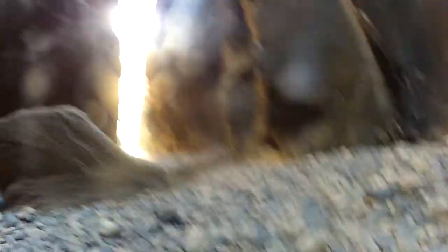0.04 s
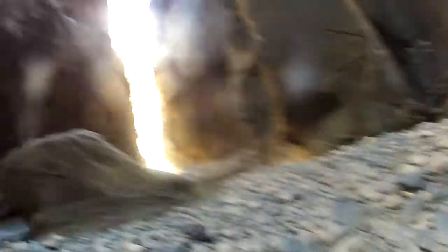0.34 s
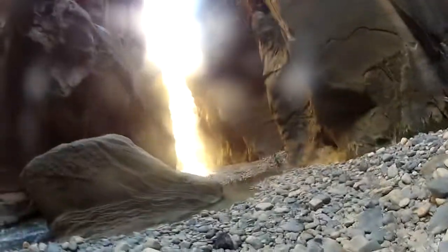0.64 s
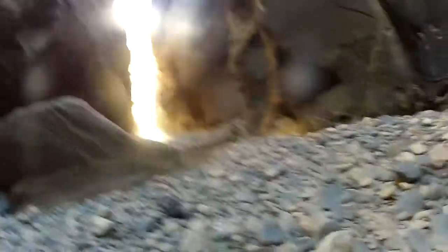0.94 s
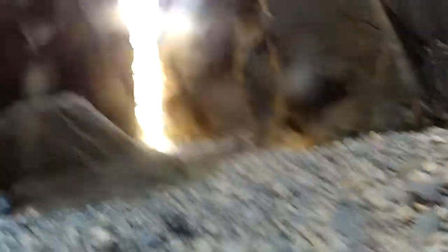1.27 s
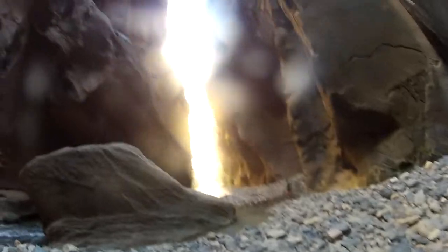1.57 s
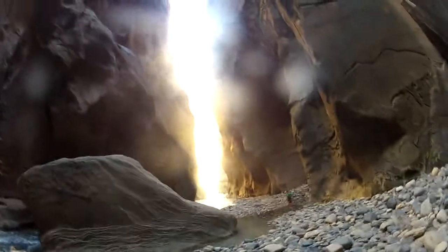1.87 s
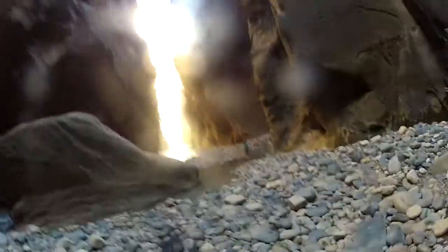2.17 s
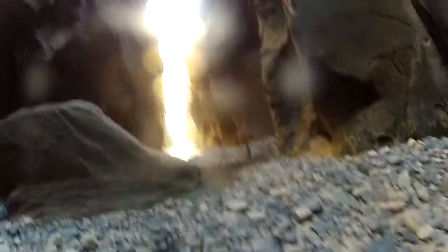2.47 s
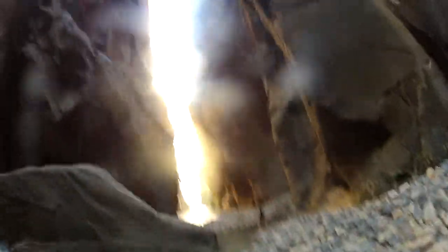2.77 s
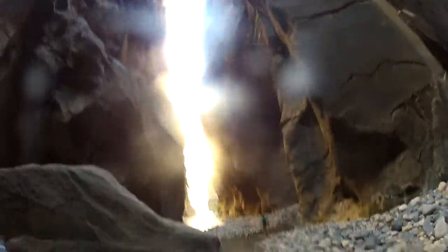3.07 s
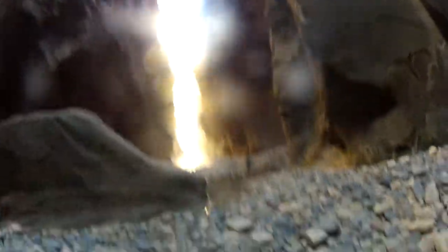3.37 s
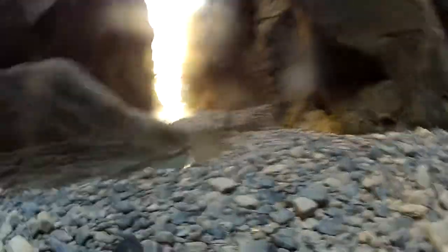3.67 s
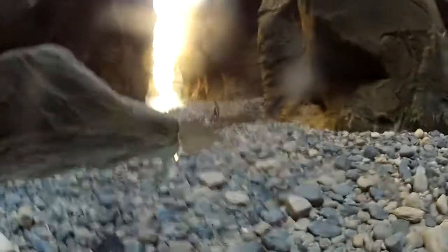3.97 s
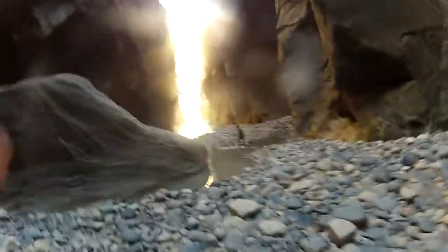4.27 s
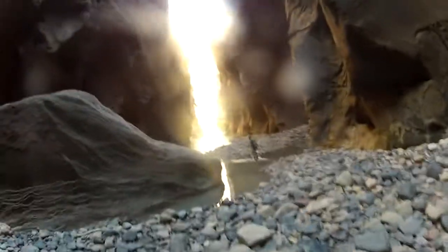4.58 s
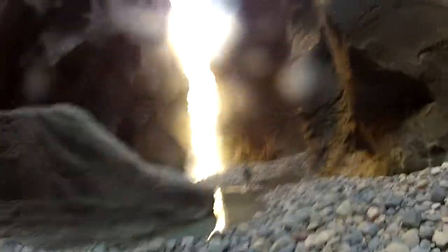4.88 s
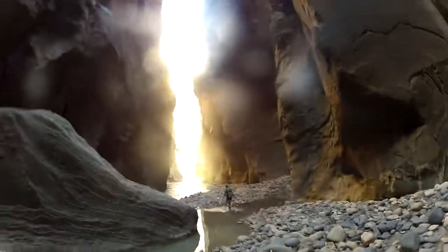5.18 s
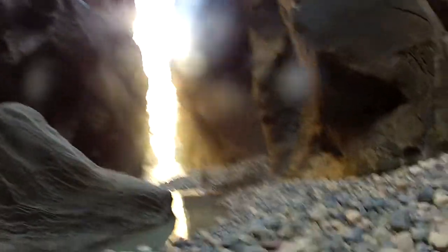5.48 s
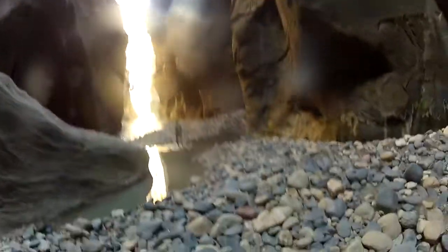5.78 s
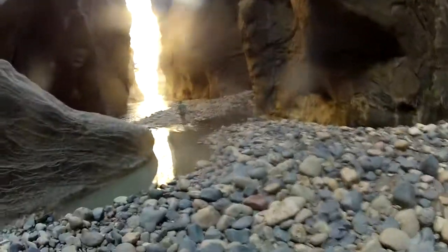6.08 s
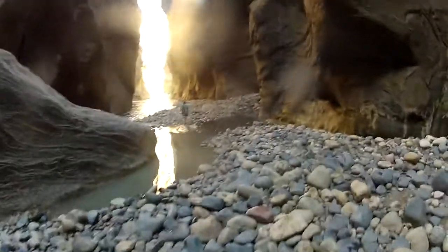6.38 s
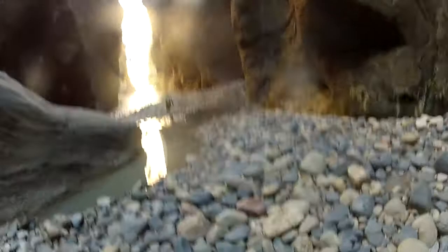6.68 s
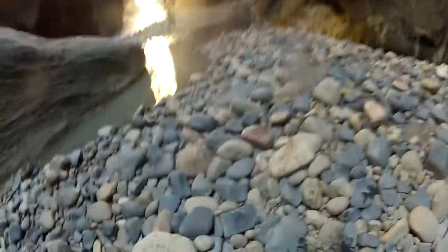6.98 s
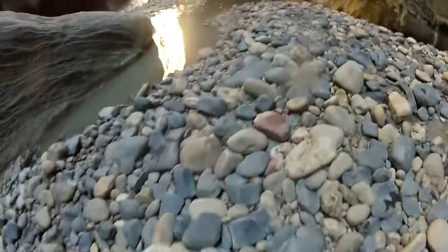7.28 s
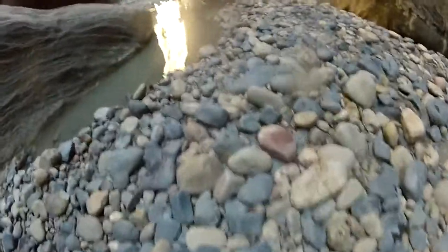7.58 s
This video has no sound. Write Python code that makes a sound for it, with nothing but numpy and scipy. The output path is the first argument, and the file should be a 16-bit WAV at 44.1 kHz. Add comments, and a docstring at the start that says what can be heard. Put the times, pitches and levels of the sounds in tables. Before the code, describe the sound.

Someone walks slowly over a pebble bank in a canyon, with light stone clicks and dull, deep jolts over the even hiss of a shallow stream. The microphone sits in a plastic case, which colours the water and adds close handling noise: a cluster of loud rubs, bumps and clacks about halfway through. More steps follow, with two dry snaps from the camera mount. The treble is slightly gritty throughout.

```python
"""Slow steps over a pebble bank in a slot canyon, heard from a hand-held camera in a case.
A shallow stream rushes from the start, coloured by the case; steps tick pebbles, knock stones and
swing the mount. From about 3.3 to 4.5 s a hand rubs, bumps and clacks the case. The steps go on,
the stream's hollow note sinks and partly returns, and the mount snaps at 5.1 and 7.5 s.
Throughout, the recorder holds each sample of a slow clock, which adds a gritty treble."""
import sys
import numpy as np
from scipy import signal
from scipy.fft import rfft, irfft, next_fast_len
from scipy.io import wavfile
from scipy.ndimage import map_coordinates

SR = 44100
rng = np.random.default_rng(int(sys.argv[2]) if len(sys.argv) > 2 else 0)


def file_out(sig):
    """Save sig as 16-bit WAV at sys.argv[1]."""
    # one column per channel
    cols = np.atleast_2d(sig).T
    # limit, then scale
    lim = np.clip(cols, -1, 1)
    pcm = np.round(lim * 32767).astype(np.int16)
    wavfile.write(sys.argv[1], SR, pcm)


N = 341334

# small pebbles ticking underfoot: start_s, level_db
PEBBLE_TICKS = [(0.1526, -29.5), (0.8886, -29.5), (1.3902, -36), (1.9229, -28), (2.3797, -29.5),
                (2.5417, -36.5), (2.6, -36), (2.621, -31), (3.9674, -34), (4.176, -31), (4.188, -31),
                (4.3433, -35), (4.372, -24.5), (4.4192, -21), (4.9412, -33), (5.2116, -34.5), (5.574, -39),
                (5.641, -36.5), (6.275, -43), (6.6997, -31.5), (6.7526, -30.5), (7.524, -27)]
# stone knocks and small, bright clacks of the case:
# start_s, level_db, pitch_hz, t60_s, brightness_db, grit_db
KNOCK_HITS = [(0.3117, -26, 1100, 0.033, -7.5, -6), (3.411, -29, 1170, 0.015, 10.5, -2),
              (5.016, -38.5, 1100, 0.014, 18.5, -7), (5.166, -34, 790, 0.023, -14, 3),
              (5.185, -37, 644, 0.032, -3, 1.5), (7.2774, -31.5, 913, 0.072, 3.5, -0.5),
              (7.280, -38, 625, 0.06, -24, -2)]
# the modes of a knock: pitch_ratio, level_db, t60_ratio
KNOCK_MODES = [(1, 1, 1), (2.005, -2, 0.72), (2.35, 5.5, 0.22)]
# steps and jolts that swing the mount: centre_s, level_db, pitch_hz, half_length_s
MOUNT_SWINGS = [(0.251, -30.5, 43.6, 0.01), (0.392, -31.5, 42, 0.03), (0.954, -24.5, 40.4, 0.031),
                (1.742, -28.5, 34.5, 0.028), (2.301, -22, 39.3, 0.032), (2.422, -24.5, 29.4, 0.05),
                (2.836, -17.5, 36, .022), (3.354, -29.5, 37, 0.016), (3.504, -19, 42.2, 0.0086),
                (4.174, -14, 49.3, 0.019), (4.289, -17, 40.5, .018), (4.363, -15, 40, 0.019),
                (5.005, -15, 48.7, 0.031), (5.703, -32, 35.4, 0.019), (6.168, -21.5, 45.4, 0.023),
                (6.6, -29.5, 45.7, 0.017), (6.763, -22, 39.2, 0.014), (7.287, -23.5, 38.7, 0.026)]
# tone of the trembling mount: frequency_hz, gain_db
TREMOR_EQ = [(12, -14), (24, -1.5), (38, 1.5), (55, -5), (80, -19), (130, -31), (300, -54), (600, -120)]
# sharp snaps of the mount: start_s, level_db, centre_hz
MOUNT_SNAPS = [(5.1258, -25, 3400), (7.4819, -22.5, 3310)]
# hand strokes, each pressing harder until it lets go: release_s, level_db, rise_s
HAND_RUBS = [(2.395, -43.5, 0.036), (2.755, -49, .08), (3.348, -40.5, 0.046), (3.472, -44, 0.029),
             (3.606, -25.5, 0.13), (3.724, -33, 0.1), (4.108, -34.5, 0.074), (4.149, -28, 0.032),
             (4.36, -34, 0.013), (4.447, -39.5, 0.048), (5.012, -46, .05), (6.715, -49.5, 0.063),
             (7.402, -46.5, 0.04)]
# tone of skin sliding on the case: frequency_hz, gain_db
SKIN_EQ = [(60, -7), (110, 4), (300, -3), (560, -8), (1100, -3.5), (1400, -8.5), (1800, -1), (2200, 1),
           (2650, -11), (3650, -9.5), (4050, -20), (4600, -20), (5950, -29)]
# soft pushes of the hand on the case: centre_s, push_db, half_length_s
HAND_BUMPS = [(3.668, -11, 0.0054), (3.729, -2.5, 0.0018), (4.099, -1, 0.0038), (7.364, -29, 0.0016)]
# hard contacts on the case: start_s, level_db
CASE_CLACKS = [(3.566, -18.5), (3.594, -27), (3.608, -26), (4.1407, -17.5), (4.155, -1), (4.1563, -8)]
# the modes of the plastic case: pitch_hz, level_db, t60_s
CASE_MODES = [(180, 3, 0.025), (323, -3, 0.029), (800, -5, 0.015), (1200, -14, 0.012), (1720, 3, 0.0059),
              (2210, 7, 0.012), (3550, 0, 0.011), (4700, -17, 0.01), (5300, -17, 0.0096)]
# the stream's faders, riding slowly as the camera moves: time_s, rush_db, hollow_db
STREAM_LEVELS = [(0, -53, -62.5), (3.3, -53.5, -62.5), (4.7, -54, -68), (5.8, -55, -86), (7.7, -55, -73)]
# tone of the rushing water: frequency_hz, gain_db
RUSH_EQ = [(60, -7), (110, -7.5), (280, -5.5), (650, -12.5), (1350, -14), (1750, -7.5), (2200, -0.5),
           (2750, -11), (3200, -8), (3700, -11.5), (4200, -21.5), (4900, -14), (5500, -22.5), (5980, -35.5)]
# narrow resonance in the rush: centre_hz, half_width_hz, boost_db
RUSH_PEAKS = [(2210, 240, 2)]

T = np.arange(N) / SR
AROUND = np.arange(-SR // 5, SR // 5) / SR  # seconds either side of a swing or bump
CLOCK_HZ, TOP_HZ = 12000, 15500
GRIP_START_S, GRIP_END_S, GRIP_FADE_S = 3.6, 4.13, 0.21


def pebbles(trim_db=-1, bounce_db=-6, settle_db=-44, settle_spread_db=1.5, settle_lag_s=0.012):
    """Pebbles tick and chatter, each bounce weaker; each tick unsettles a fainter neighbour."""
    out = np.zeros(N)
    chance = rng.standard_normal((len(PEBBLE_TICKS), 2))
    neighbours = [(s + settle_lag_s * abs(lag), settle_db + settle_spread_db * size)
                  for (s, _), (lag, size) in zip(PEBBLE_TICKS, chance)]
    for s, db in PEBBLE_TICKS + neighbours:
        gaps_s = rng.uniform(0.0013, 0.0043, size=3)
        for bounce, delay in enumerate(np.cumsum([0, *gaps_s])):
            tick = burst(hz=5090, width_hz=870, rise_s=0.0005)
            add(out, s + delay, amp(db + trim_db + bounce_db * bounce) * tick)
    return out


def knocks(ping_hz=4520, ping_db=-15, attack_s=0.00098):
    """Knocks with a short ring and grit; each also sets off a thin ping in the camera case."""
    out, t = np.zeros(N), T[:SR // 10]
    attack = 1 - np.exp(-t / attack_s)
    for s, db, hz, t60, bright_db, grit_db in KNOCK_HITS:
        ring = sum(partial(t, hz * ratio, level + bright_db * (k > 0), share * t60)
                   for k, (ratio, level, share) in enumerate(KNOCK_MODES))
        case_ping = partial(t, ping_hz, ping_db + min(bright_db, 0), t60)
        add(out, s, amp(db) * (ring + case_ping) * attack)
        add(out, s, amp(db + grit_db) * burst(hz=hz, width_hz=0.74 * hz, rise_s=t60 / 14))
    return out


def mount_sway(trim_db=-0.5, heel_db=-11, heel_lead_s=0.0224, rest_db=-50, grip_db=-31, shake_db=-18.5):
    """The heel thuds and the mount swings; it trembles more around steps and as the grip shifts."""
    swings = np.zeros(N)
    tremor_power = amp(rest_db) ** 2 + (amp(grip_db) * grip()) ** 2
    for s, db, hz, half_length in MOUNT_SWINGS:
        start = s + AROUND[0]
        add(swings, start, amp(db + trim_db) * thud(hz, half_length))
        add(swings, start - heel_lead_s, amp(db + heel_db) * thud(hz=61.3, half_length_s=0.01))
        tremor_power += (amp(db + shake_db) * swell(s, s, rise_s=0.2, fall_s=0.36)) ** 2
    tremor = noise(lambda hz: eq(TREMOR_EQ, hz))
    return swings + np.sqrt(tremor_power) * tremor


def case_clacks(crack_db=-12):
    """Each hard contact cracks and briefly rings the plastic case."""
    out, t = np.zeros(N), T[:SR // 20]
    for s, db in CASE_CLACKS:
        ring = sum((-1) ** k * partial(t, hz, level + rng.normal(0, 1), t60)
                   for k, (hz, level, t60) in enumerate(CASE_MODES))
        add(out, s, amp(db) * ring / np.abs(ring).max())
        add(out, s, amp(db + crack_db) * burst(hz=2700, width_hz=4300, rise_s=0.00073))
    return out


def hand_bumps(spring_hz=36, damping=0.4):
    """A soft push squeezes the air in the case, which then springs back."""
    push = np.zeros(N)
    for s, db, half_length in HAND_BUMPS:
        rounded_spike = np.exp(0.5 - np.hypot(AROUND / half_length, 0.5))
        add(push, s + AROUND[0], amp(db) * rounded_spike)
    return filtered(push, lambda hz: hz ** 2 / (spring_hz ** 2 - hz ** 2 + 2j * damping * spring_hz * hz))


def hand_rubs(grains_per_s=1400, hiss_gain=0.64, clump_db=1.6, trim_db=-1, grip_db=-47.5, grind_db=14.5):
    """Skin sticks and slips on the case: clumps of grains over a hiss; a firm stroke grinds low."""
    power = (amp(grip_db) * grip()) ** 2
    for s, db, rise in HAND_RUBS:
        stroke = swell(s - 0.15 * rise, s, rise_s=rise, fall_s=0.29 * rise)
        power += (amp(db) * stroke) ** 2
    pressure = np.sqrt(power)
    slips = unit(rng.standard_normal(N) * (rng.random(N) < grains_per_s / SR))
    friction = (slips + hiss_gain * rng.standard_normal(N)) * amp(clump_db * wobble(260))
    rustle = unit(filtered(friction, lambda hz: eq(SKIN_EQ, hz)))
    grind = noise(lambda hz: bell(hz, centre=474, half_width=370))
    # the grind grows faster with pressure than the rustle
    return amp(trim_db) * pressure * rustle + amp(grind_db) * pressure ** 1.83 * grind


def grip():
    """Envelope of the hand shifting its grip once, 0 to 1."""
    return swell(GRIP_START_S, GRIP_END_S, GRIP_FADE_S, GRIP_FADE_S)


def mount_snaps():
    """The mount snaps with a dry, bright click."""
    out = np.zeros(N)
    for s, db, hz in MOUNT_SNAPS:
        add(out, s, amp(db) * burst(hz=hz, width_hz=1430, rise_s=0.00055))
    return out


def stream(flutter_db=0.37, rush_trim_db=2, hollow_trim_db=-5):
    """The bed: water rushes some way off, smoothed by the canyon, coloured by the air in the case."""
    times, *faders = np.transpose(STREAM_LEVELS)
    rush_db, hollow_db = [np.interp(T, times, fader) for fader in faders]
    peaks = lambda hz: amp(sum(db * bell(hz, centre, width) for centre, width, db in RUSH_PEAKS))
    rush = noise(lambda hz: eq(RUSH_EQ, hz) * peaks(hz))
    hollow = noise(lambda hz: bell(hz, centre=1110, half_width=90))
    rush *= amp(rush_db + rush_trim_db + flutter_db * wobble(11))
    return rush + hollow * amp(hollow_db + hollow_trim_db)


def burst(hz, width_hz, rise_s):
    """A click peaking near 1: band-passed noise that rises and dies away."""
    t = T[:SR // 20]
    edges = np.clip([hz - width_hz / 2, hz + width_hz / 2], 100, SR / 2 - 100)
    band = signal.butter(3, edges, "band", fs=SR, output="sos")
    hiss = signal.sosfilt(band, rng.standard_normal(2 * len(t)))[len(t):]
    envelope = t / rise_s * np.exp(1 - t / rise_s)
    click = hiss * envelope
    return 0.5 * np.linalg.norm(envelope) * click / np.linalg.norm(click)


def partial(t, hz, db, t60):
    """A struck sine that falls 60 dB in t60 seconds."""
    return amp(db - 60 * t / t60) * np.sin(2 * np.pi * hz * t)


def thud(hz, half_length_s):
    """A low tone that swells and fades in a moment."""
    return bell(AROUND, 0, half_length_s) * np.cos(2 * np.pi * hz * AROUND)


def swell(start, end, rise_s, fall_s):
    """Attack, hold from start to end, release; rise_s and fall_s each cover 20 dB."""
    return amp(-20 * np.maximum(0, np.maximum((start - T) / rise_s, (T - end) / fall_s)))


def wobble(knots_per_s):
    """A smooth random curve."""
    return map_coordinates(rng.standard_normal(int(N * knots_per_s / SR) + 4), [T * knots_per_s])


def noise(response):
    """Coloured noise at unit RMS."""
    return unit(filtered(rng.standard_normal(N), response))


def filtered(x, response):
    """Shape x with a gain that depends on frequency."""
    size = next_fast_len(len(x) + 8192)
    return irfft(rfft(x, size) * response(np.fft.rfftfreq(size, 1 / SR)), size)[:len(x)]


def eq(points, hz):
    """Gain through EQ points on a log axis, cut off at half the slow clock's rate."""
    point_hz, db = np.transpose(points)
    return amp(np.interp(np.log(hz + 1), np.log(point_hz), db)) * (hz < CLOCK_HZ / 2)


def add(track, s, sound):
    """Mix a short sound into a track at s seconds."""
    part = track[max(round(s * SR), 0):][:len(sound)]
    part += sound[:len(part)]


def bell(x, centre, half_width):
    return np.exp(-((x - centre) / half_width) ** 2)


def amp(db):
    return 10 ** (np.asarray(db) / 20)


def unit(x):
    return x / np.sqrt(np.mean(x ** 2) + 1e-20)


def scene():
    """The mono mix: stream bed, handling noise, knocks and pebbles."""
    bed = stream()
    handling = mount_sway() + hand_bumps() + hand_rubs() + case_clacks() + mount_snaps()
    return (bed + handling + knocks() + pebbles())[None]


def record(dry):
    """Each sample of the slow clock is held until the next, which mirrors the sound into the treble."""
    oversampled = signal.resample_poly(dry[0], 4 * CLOCK_HZ, SR)
    staircase = np.repeat(oversampled[::4], 4)
    gritty = signal.resample_poly(staircase, SR, 4 * CLOCK_HZ)[:N]
    return filtered(gritty, lambda hz: hz < TOP_HZ)[None]


dry = scene()
out = record(dry)
file_out(out)
```